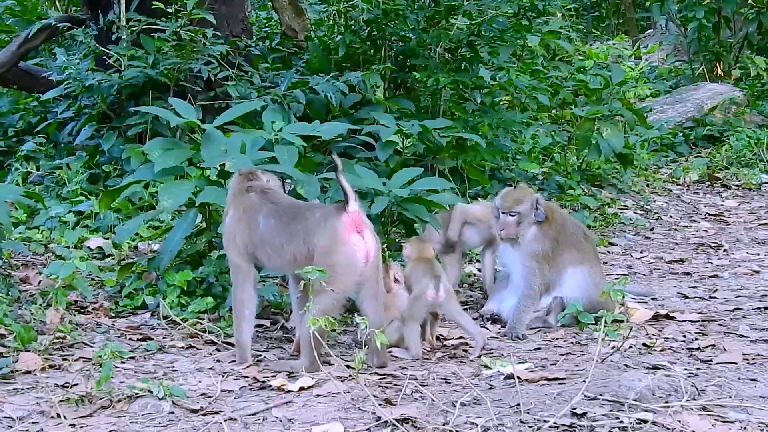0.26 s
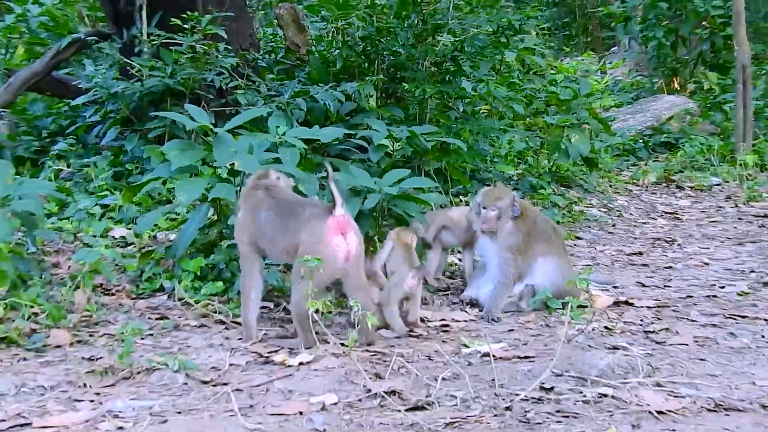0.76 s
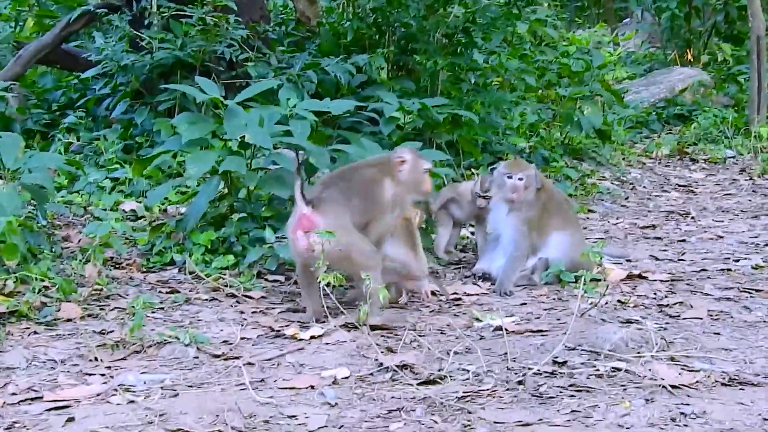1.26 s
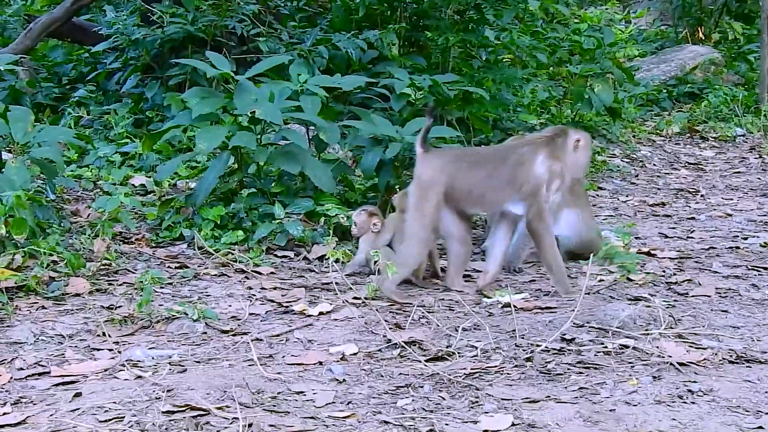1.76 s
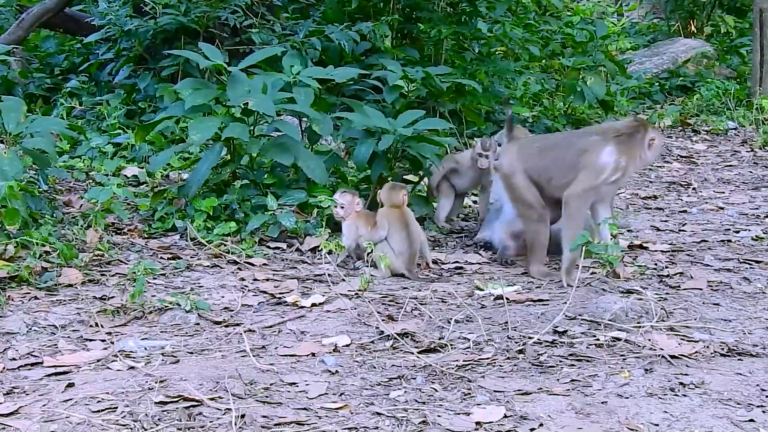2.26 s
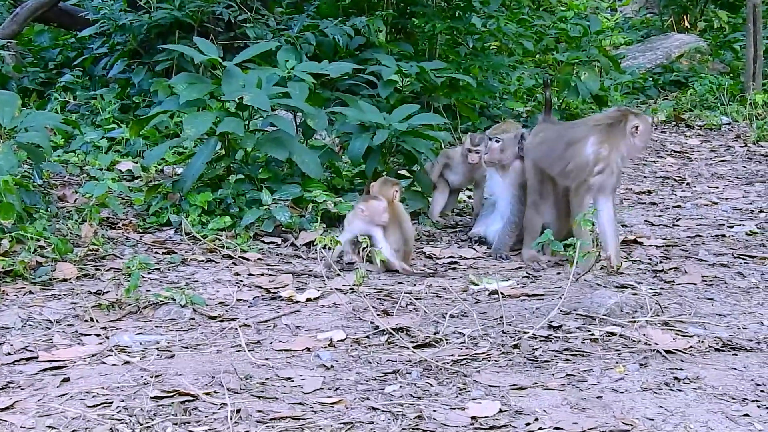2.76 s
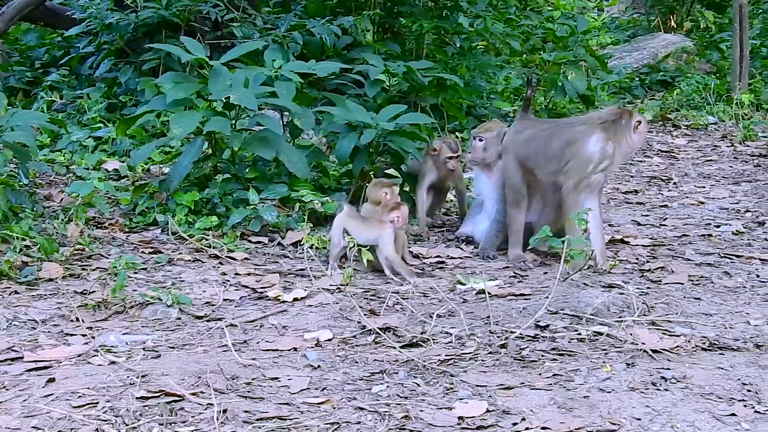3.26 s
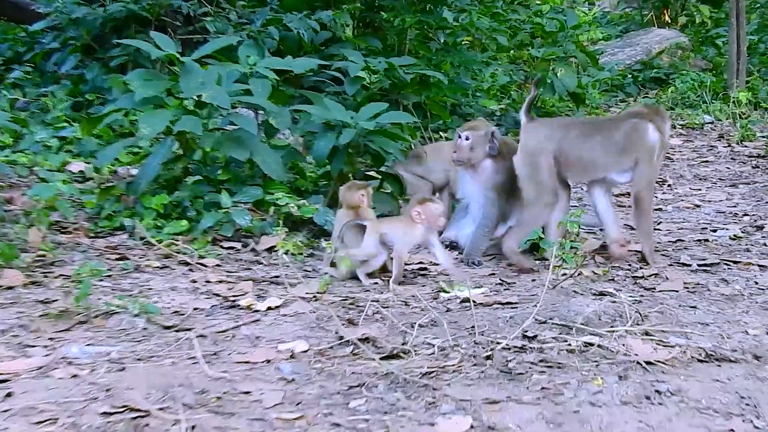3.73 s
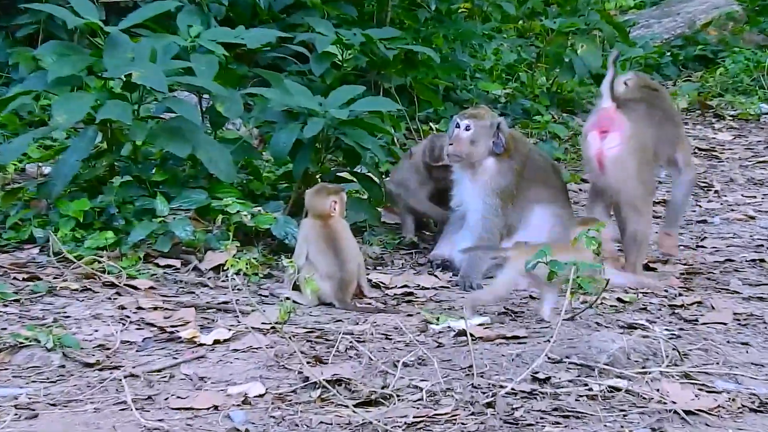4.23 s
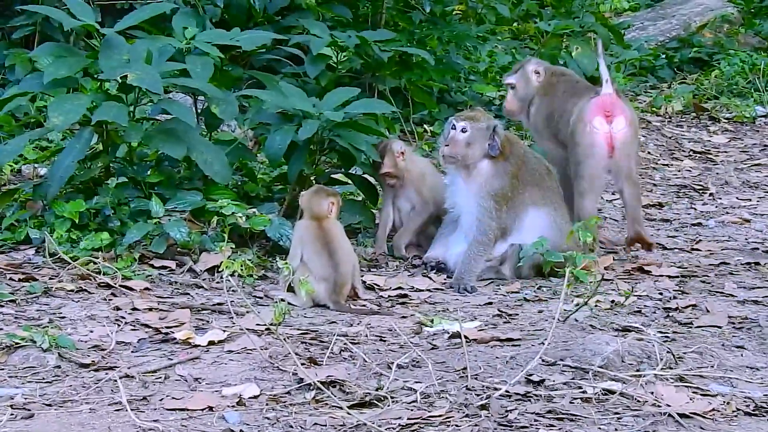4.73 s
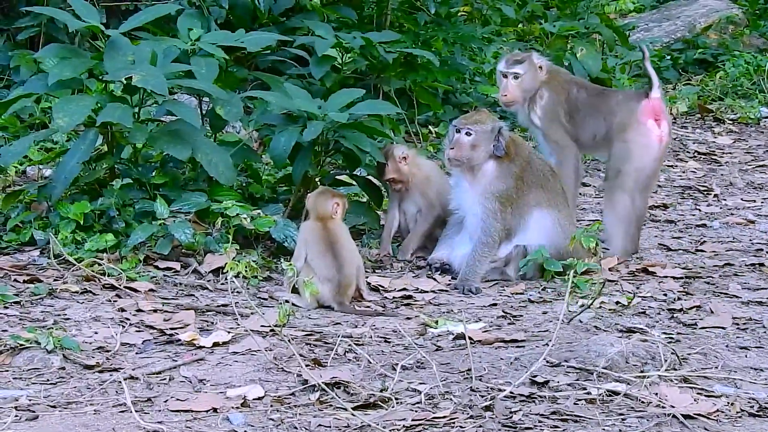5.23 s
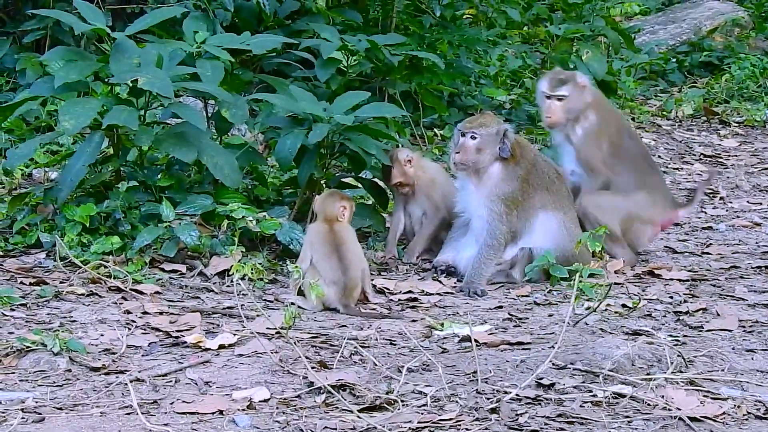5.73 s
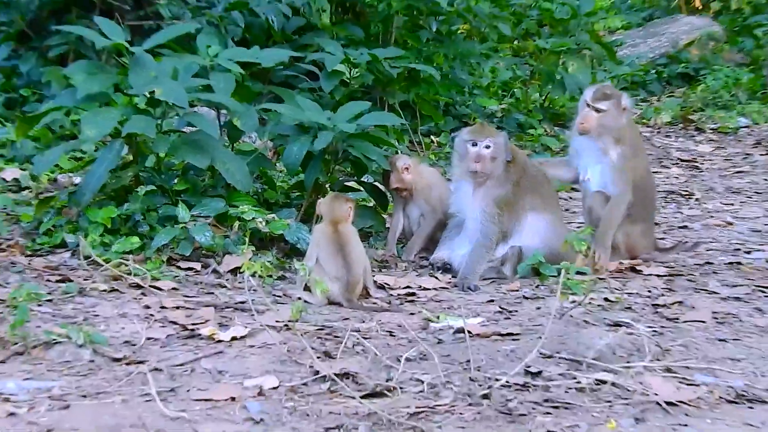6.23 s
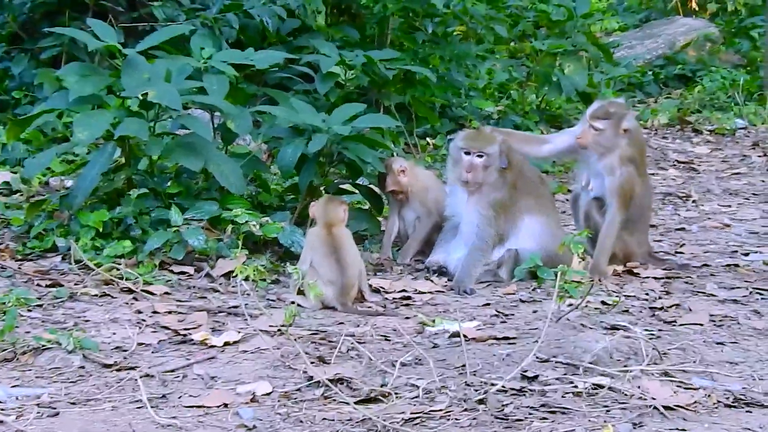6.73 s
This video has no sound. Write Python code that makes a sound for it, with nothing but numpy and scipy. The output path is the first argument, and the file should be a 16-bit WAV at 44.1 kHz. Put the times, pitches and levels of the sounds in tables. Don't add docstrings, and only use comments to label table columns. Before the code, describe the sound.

A shrill insect drone dominates from start to finish, slightly fluttering and echoed by tree trunks, over soft distant rumble and leaf hiss. Brief woody knocks open the scene, a quiet middle follows with barely audible coos, then a sharp snap and dry leaf tick, light steps, and a busier cluster of scuffs and soil thumps. Wide, open-air stereo pickup with the animals several steps away.

```python
import sys
import numpy as np
from scipy import signal
from scipy.fft import rfft, irfft
from scipy.io import wavfile
from scipy.ndimage import uniform_filter1d

SR = 44100
rng = np.random.default_rng(int(sys.argv[2]) if len(sys.argv) > 2 else 0)


def store_pcm(level_fs):
    pcm = np.round(np.clip(level_fs, -1, 1) * 32767).astype(np.int16)
    wavfile.write(sys.argv[1], SR, np.atleast_2d(pcm).T)


def voltage_ratio(level):
    return 10 ** (np.asarray(level, float) / 20)


N = 308469


def evened(x):
    return x / np.sqrt(np.mean(x ** 2) + 1e-20)


def read(points, hz):
    f, value = np.transpose(points)
    return np.interp(np.log(hz + 1), np.log(f + 1), value)


def curve(rows, t):
    s, value = np.transpose(rows)
    return np.interp(t, s, value - value.mean())


def sides(pan_db):
    return voltage_ratio(np.array([[.5], [-.5]]) * pan_db)


def add(mix, s, sound):
    part = mix[:, round(s * SR):][:, :sound.shape[-1]]
    part += sound[..., :part.shape[1]]


def wander(hz):
    count = N // 64 + 2
    rolloff = 1 + (np.fft.rfftfreq(count, 64 / SR) / hz) ** 4
    slow = irfft(rfft(rng.standard_normal(count)) / rolloff, count)
    return np.interp(np.arange(N) / 64, np.arange(count), evened(slow))


def ring(x, hz, width_hz):
    return signal.lfilter(*signal.iirpeak(min(hz, SR / 2.2), hz / width_hz, SR), x)


def hiss(level_db, lead_s, patchy_db, size=2048):
    # frequency in Hz, coherence of the two ears from 0 to 1
    coherence = [(60, .996), (200, .988), (320, .8), (800, .87), (2100, .82), (3000, .92), (4000, .72),
                 (6500, .6), (9000, .4)]
    frames = N * 4 // size + 5
    hz = np.fft.rfftfreq(size, 1 / SR)[:, None]
    t = np.arange(frames) * size / 4 / SR
    a, b, c, d, patches = rng.standard_normal((frames, len(hz), 5)).T
    patches = uniform_filter1d(patches, size=14, axis=0)
    patches = evened(uniform_filter1d(patches, size=6, axis=1))
    same = np.clip(read(coherence, hz), -1, 1)
    left = a + 1j * b
    delay = np.exp(-2j * np.pi * np.maximum(hz - 1700, 0) * lead_s)
    right = same * left * delay + np.sqrt(1 - same ** 2) * (c + 1j * d)
    z = np.array([left, right]) * voltage_ratio(level_db(hz, t) + patchy_db * patches)
    return evened(signal.istft(z, nperseg=size, noverlap=size * 3 // 4)[1][:, :N])


def trunks(x, t60, same):
    size = SR // 2
    taps = rng.choice([-1., 1.], (2, size)) * (rng.random((2, size)) < 2000 / SR)
    taps[:, :200] = 0
    same = np.clip(same, 0, 1)
    taps[1] = same * taps[0] + np.sqrt(1 - same ** 2) * taps[1]
    taps *= voltage_ratio(-60 * np.arange(size) / SR / t60)
    return signal.fftconvolve(x, taps / np.linalg.norm(taps[0]), axes=1)[:, :N]


def verse(t):
    # level in dB at rest, on the swing, in the catch, in the stretch
    colour = [(-2, 0.9, -2.5, -2), (-1.5, 0, -1, -8), (-4.5, 0.8, -2, 5)]
    pump_s = .468
    swing_top_s, stretch_at_s, stretch_s = .86, .276, .065
    catch_fall_s, catch_rise_s = .045, .08
    since = (t + pump_s / 2) % pump_s - pump_s / 2
    catch = np.exp(-(since / np.where(since < 0, catch_fall_s, catch_rise_s)) ** 2)
    stretch = np.exp(-((t % pump_s - stretch_at_s) / stretch_s) ** 2)
    swing = np.cos(np.pi * (t - swing_top_s) / pump_s)
    drift_hz = -.14 * (t - N / SR / 2)
    hz = 569.1 + drift_hz + 1.4 * swing - 4.5 * catch - 2.8 * stretch
    return hz, np.array(colour) @ np.array([np.ones(len(t)), swing, catch, stretch])


def song(hz, colour_db, flicker_db, lead, sway):
    # multiple of the buckle rate, level in dB, left-right difference in dB
    overtones = [(3, -63.5, -5), (4, -58, -2), (5, -28.5, 4), (6, -55, 6), (7, -56.5, 4), (8, -54.5, -1),
                 (9, -71, -20), (10, -18.5, -2), (11, -40.5, -9), (12, -43.5, -7), (13, -55.5, -1),
                 (14, -46, 9), (15, -33, 1), (16, -56.5, -14), (17, -62.5, 11), (18, -69, -5),
                 (19, -61.5, -4), (20, -54.5, 1.5), (25, -71.5, 3)]
    turn = 2 * np.pi * np.cumsum(hz) / SR
    out = np.zeros((2, N))
    gains = [np.sqrt(2) * voltage_ratio(db + flicker_db * wander(34)) for db in colour_db]
    swaying = sway * wander(13.3)
    for k, db, pan_db in overtones:
        k = round(k)
        half = np.array([[.5], [-.5]]) * (lead * (k - 3) + k * swaying)
        wave = np.cos(k * turn + 2 * np.pi * rng.random() + half)
        group = int(np.clip((k - 3) // 5, 0, 2))
        out += voltage_ratio(db) * sides(pan_db) * gains[group] * wave
    return out


def cicadas():
    # time in seconds, level in dB
    effort = [(0, -1.5), (.7, -1.5), (1.2, -1), (1.7, 1), (2.2, -1.5), (3, -1.5), (4.2, -2), (5, -1.5),
              (5.7, -0.5), (6.3, -2), (6.99, -2)]
    t = np.arange(N) / SR
    hz, colour_db = verse(t)
    near = song(hz + .25 * wander(30), colour_db + curve(effort, t), 2, .14, .045)
    other = song(571.3 + 1.6 * wander(25), [-15.5, -15.5, -14], 3, .14, .045)
    return near + voltage_ratio(-9) * trunks(near, .3, .6) + voltage_ratio(-4) * other + trunks(other, .4, .6)


def crowd():
    # buckle rate in Hz, share of the singers in dB
    singers = [(470, -39.5), (510, -9.5), (530, -6), (550, 2.5), (562, 7), (572, 11.5), (577, -4.5),
               (582, -10), (600, -10.5), (660, -35.5)]
    # multiple of the buckle rate, level in dB, left-right difference in dB
    bands = [(5, -39.5, 1.5), (10, -34.5, -2.5), (15, -43, 3.5), (20, -66.5, 1)]

    def level_db(hz, t):
        power = 0
        for k, db, pan_db in bands:
            share_db = read(singers, hz / round(k))
            power = power + (voltage_ratio(db + share_db) * sides(pan_db)[..., None]) ** 2 / k
        return 10 * np.log10(power) + 0 * t
    return voltage_ratio(-25.5) * hiss(level_db, 4e-5, 1.27)


def air():
    # frequency in Hz, spectral density in dB per Hz
    spectrum = [(22, -66), (50, -5.5), (100, 1), (210, -8.5), (290, -19), (380, -18.5), (520, -23),
                (900, -22.5), (2000, -27.5), (3300, -24.5), (4300, -33), (6300, -14), (7600, -26),
                (9200, -37)]
    # time in seconds, level in dB
    stir = [(0, -1), (1, 0), (2.1, -1.5), (4.15, 0.5), (6.99, 0)]
    swell_db = .9 * wander(1.3)

    def level_db(hz, t):
        leaves = np.clip((hz - 230) / 150, 0, 1) * np.clip((3000 - hz) / 900, 0, 1)
        top_db = np.maximum(-34 * np.maximum(hz - spectrum[-1][0], 0) / 1000, -48)
        rumble_db = (hz < 300) * swell_db[np.minimum(t * SR, N - 1).astype(int)]
        return read(spectrum, hz) + top_db + rumble_db + leaves * curve(stir, t)
    return voltage_ratio(-32) * sides(.42) * hiss(level_db, 4e-6, 1.4)


def snap(db, hz, crack_db):
    # ring in Hz, left-right difference in dB
    lean = [(450, 3), (1000, 1)]
    t = np.arange(SR // 8) / SR
    t60 = .026 * voltage_ratio(-.96 * max(db + 19.5, 0))
    decay = voltage_ratio(-60 * np.maximum(t - .004, 0) / t60)
    burst = rng.standard_normal(len(t)) * decay * np.minimum(t / .00049, 1)
    burst[8] += 10
    knock = ring(ring(burst, hz, 270), hz, 580)
    crack = signal.sosfilt(signal.butter(3, [550, 2900], "band", fs=SR, output="sos"), burst)
    crack = crack + ring(burst, 1.83 * hz, 180)
    blow = knock / abs(knock).max() + voltage_ratio(crack_db) * crack / abs(crack).max()
    return voltage_ratio(db) * sides(read(lean, hz)) * blow


def coo(length, db, first_hz, last_hz):
    u = np.arange(0, length, 1 / SR) / length
    turn = 2 * np.pi * np.cumsum(first_hz + (last_hz - first_hz) * u) / SR
    return voltage_ratio(db - 19 * (2 * u - 1) ** 2) * (np.sin(turn) + .15 * np.sin(2 * turn))


def tick(db, hz):
    t = np.arange(SR // 5) / SR
    burst = rng.standard_normal(len(t)) * voltage_ratio(-60 * t / .0089)
    band = signal.butter(1, [hz, 1.3 * hz], "band", fs=SR)
    return voltage_ratio(db) * sides(-14) * signal.lfilter(*band, burst)


def scuff(length, db, hz, width_hz):
    draw = rng.standard_normal((SR // 2, 3))[:round(length * SR)].T
    grain = np.clip(evened(uniform_filter1d(draw[2], size=90)), -3, 3)
    grit = draw[:2] * .5 + draw[0] * voltage_ratio(4.8 * grain)
    shaped = ring(ring(grit, hz, width_hz), hz, 3.1 * width_hz)
    return voltage_ratio(db) * evened(shaped) * signal.windows.tukey(grit.shape[1], .6)


def thump(db, hz, t60):
    t = np.arange(SR // 5) / SR
    return voltage_ratio(db) * np.sin(2 * np.pi * hz * t) * voltage_ratio(-60 * t / t60) * np.minimum(t / .0026, 1)


def monkeys():
    # start in seconds, level in dB, ring in Hz, crack in dB
    snaps = [(0.065, -20, 940, -4), (0.597, -27, 500, -7), (0.616, -28.5, 940, -2), (0.916, -24.5, 466, -8),
             (0.979, -30, 939, -9), (0.998, -24, 417, -4), (3.252, -35, 620, 3), (3.754, -29.5, 511, -8),
             (3.857, -34, 842, -5), (3.925, -26, 880, -11), (4.487, -33, 956, 13.5), (4.496, -31, 460, -9),
             (4.5605, -17, 916, 6.5), (5.328, -26.5, 530, 1), (6.186, -25.5, 493, -11),
             (6.207, -31, 930, 4), (6.437, -31, 401, -8), (6.612, -24.5, 585, -0.5), (6.762, -32.5, 886, 5),
             (6.909, -31.5, 1090, 12.5), (6.986, -28, 589, -10)]
    # start in seconds, level in dB, low edge in Hz
    ticks = [(.74, -41, 8500), (3.18, -40, 8500), (3.68, -38, 8500), (4.13, -41, 8500), (4.569, -9, 5000),
             (4.63, -39, 8500), (4.745, -48, 13000), (5.47, -43, 9000), (5.71, -42, 9000),
             (6.775, -30, 5500), (6.91, -40, 8500)]
    # start in seconds, level in dB, pitch in Hz, T60 in seconds
    thumps = [
        (3.966, -30, 219, 0.27),
        (4.484, -27.5, 236, 0.12),
        (5.007, -28, 320, 0.09),
        (5.777, -35, 237, 0.12),
        (6.187, -23, 219, 0.14),
        (6.464, -23.5, 212, 0.14),
        (6.617, -19.5, 287, 0.1),
    ]
    # start in seconds, length in seconds, level in dB, centre in Hz
    scuffs = [(0.918, 0.14, -41, 703.5), (2.08, 0.04, -43.5, 1200), (4.488, 0.045, -38.5, 1200),
              (5.016, .14, -55, 10000), (5.085, 0.044, -43.5, 1500), (5.303, 0.085, -36.5, 900),
              (5.69, 0.056, -38, 700), (6.208, 0.056, -38.5, 1070), (6.43, 0.048, -39.5, 800),
              (6.504, 0.28, -52, 9500), (6.6, 0.061, -35.5, 870)]
    brushes = [
        (.95, .1, -43, 450),
        (5.359, 0.092, -39, 350),
        (6.2, .06, -41, 450),
        (6.38, 0.028, -39, 3480),
        (6.565, 0.084, -34, 3240),
        (6.629, 0.12, -40.5, 430),
        (6.66, .1, -41, 3500),
    ]
    squeaks = [
        (1.19, 0.1, -44, 424),
        (2.64, .022, -40, 4750),
        (3.94, 0.26, -48, 950),
        (6.59, .03, -40, 2990),
        (6.63, 0.063, -41, 3520),
    ]
    # start in seconds, length in seconds, level in dB, first and last pitch in Hz
    coos = [
        (.272, .065, -32.5, 381, 518),
        (.32, 0.051, -33.5, 500, 410),
        (3.001, 0.34, -49, 353, 420),
        (3.978, .21, -49, 906, 1000),
        (4.206, 0.19, -43, 402, 500),
    ]
    out = np.zeros((2, N))
    for s, *blow in snaps:
        add(out, s, snap(*blow))
    for s, *leaf in ticks:
        add(out, s, tick(*leaf))
    for s, *landing in thumps:
        add(out, s, thump(*landing))
    for rows, width_hz in ((scuffs, 1500), (brushes, 520), (squeaks, 120)):
        for s, *drag in rows:
            add(out, s, scuff(*drag, width_hz))
    for s, *call in coos:
        add(out, s, coo(*call))
    return out + voltage_ratio(-12) * trunks(out, .1, .6)


def scene():
    return cicadas() + crowd() + air() + monkeys()


def low_pass(x):
    return signal.sosfilt(signal.butter(12, 15800, fs=SR, output="sos"), x)


def record(dry):
    cut = signal.sosfilt(signal.butter(2, 42, "high", fs=SR, output="sos"), dry)
    hz, _, z = signal.stft(cut, SR, nperseg=2048, noverlap=1024)
    power = uniform_filter1d((abs(z) ** 2).mean(0), size=8, axis=0)[4::8]
    patch_db = 10 * np.log10(np.repeat(power, 8, axis=0) + 1e-20)
    limit_db = np.interp(hz[:-1], [9000, 9250, 11700, 11900], [-110, -76.5, -74.5, -76])
    z[:, :-1] *= patch_db > limit_db[:, None]
    gated = signal.istft(z, SR, nperseg=2048, noverlap=1024)[1][:, :N]
    return low_pass(gated)


dry = scene()
out = record(dry)
store_pcm(out)
```